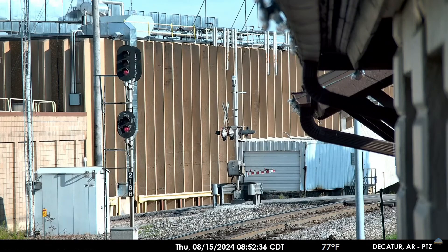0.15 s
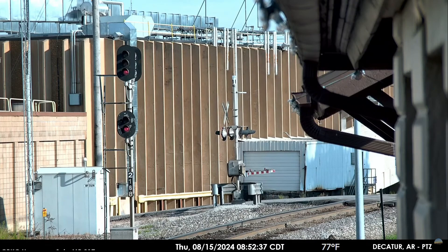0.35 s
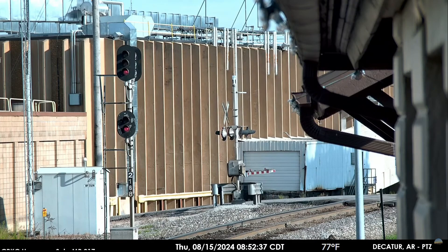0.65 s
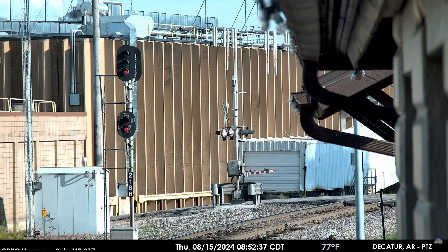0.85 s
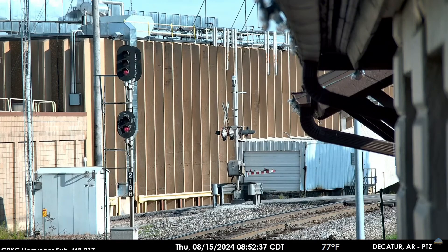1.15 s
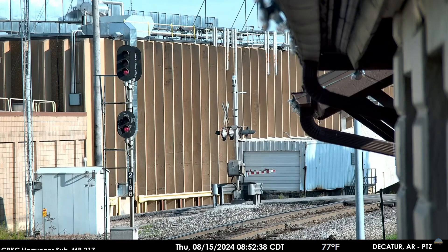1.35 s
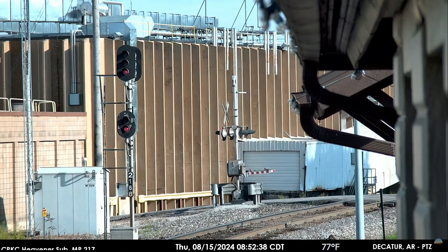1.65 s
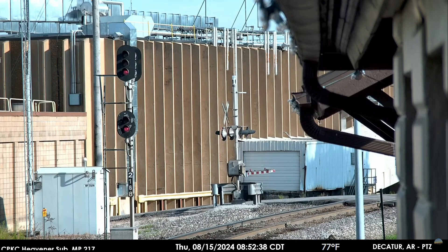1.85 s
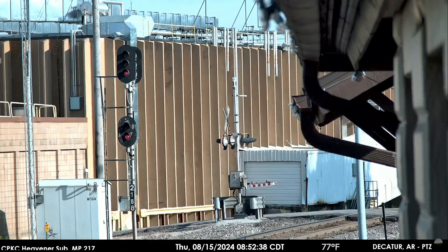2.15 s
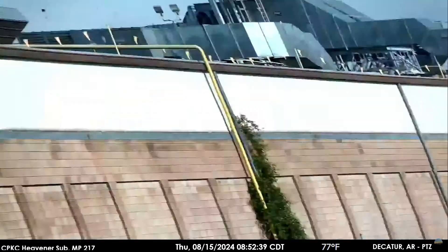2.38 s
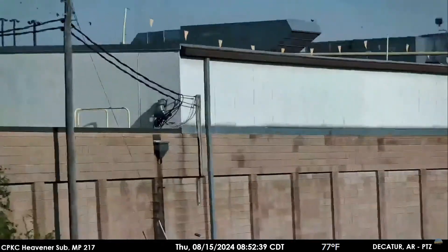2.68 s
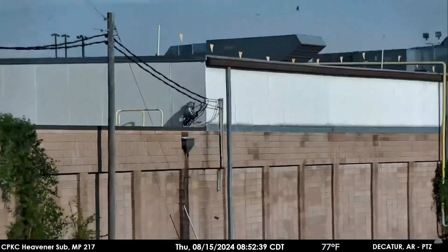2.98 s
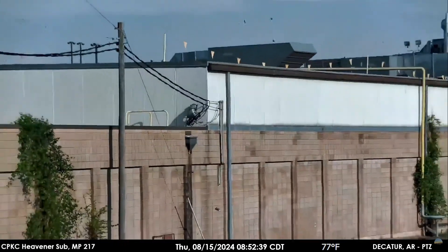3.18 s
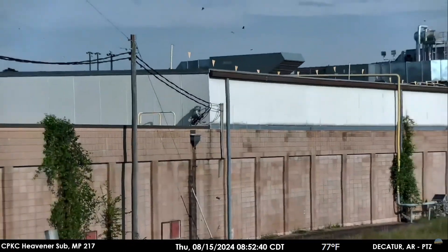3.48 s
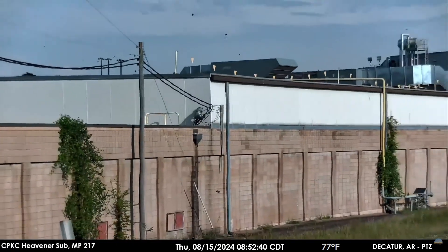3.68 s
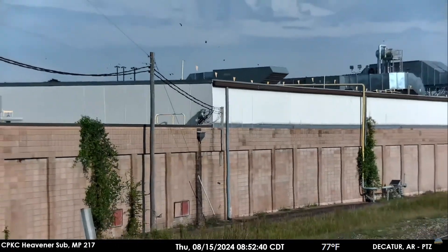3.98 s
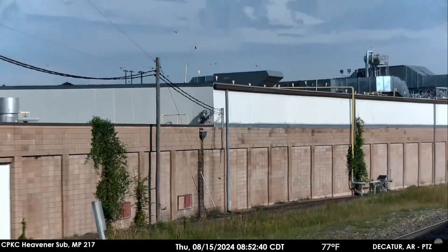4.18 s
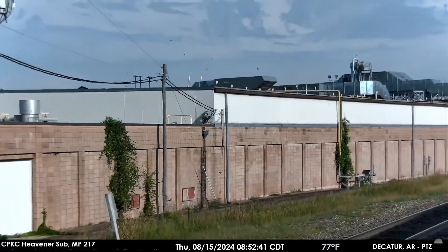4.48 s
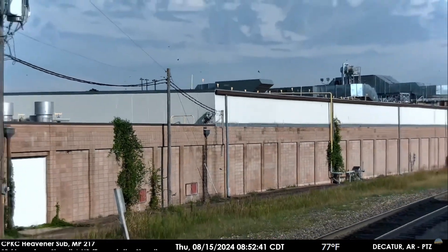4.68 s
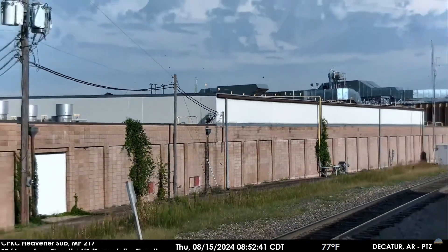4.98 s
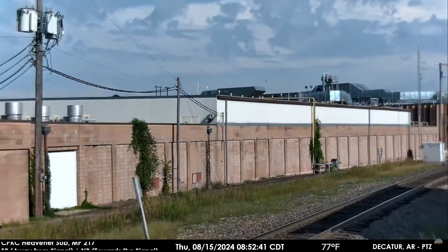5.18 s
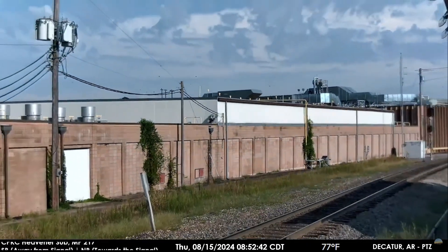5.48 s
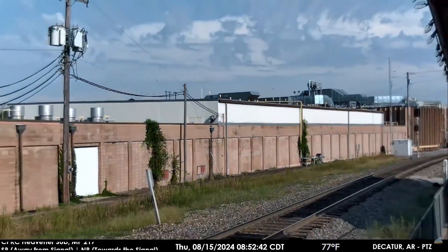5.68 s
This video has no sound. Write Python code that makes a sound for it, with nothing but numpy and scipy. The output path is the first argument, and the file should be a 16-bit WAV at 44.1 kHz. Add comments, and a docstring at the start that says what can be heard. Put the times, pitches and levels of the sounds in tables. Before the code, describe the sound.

A train's chordal air horn gives two short blasts and starts a third, echoing off walls while wind buffets the microphone over a distant rumble.

```python
"""Trackside near factory walls: an approaching freight locomotive sounds its five-chime air horn.
Two short blasts and the start of a third are summed from the wavering harmonics of five bells.
Delayed copies and a decaying noise tail answer from the walls; fans whine thinly.
The far train is a drone of unsteady tones under shaped noise.
Gusts of low noise, thumps, flutter and crackle buffet the microphone and push it into overload."""
import sys
import numpy as np
from scipy import signal
from scipy.fft import rfft, irfft, next_fast_len
from scipy.io import wavfile
from scipy.ndimage import uniform_filter1d

SR = 44100
rng = np.random.default_rng(int(sys.argv[2]) if len(sys.argv) > 2 else 0)


def pcm_store(signal):
    """Save signal as 16-bit PCM."""
    levels = np.round(np.clip(np.atleast_2d(signal), -1, 1) * 32767)
    wavfile.write(sys.argv[1], SR, levels.astype(np.int16).T)


N = 257720
TIME = np.arange(N) / SR

# blasts of the horn: opens_s, starts_to_close_s, attack_s, level_db, sag_db_per_s, treble_db
BLASTS = [(0.142, .785, 0.0019, -29.5, 5.5, -7.5), (3.185, 3.864, 0.021, -31.5, 2.5, 0),
          (5.78, 5.95, 0.028, -26.5, -22, -2)]
# fundamental of each bell: pitch_hz
BELL_HZ = (331.2, 384.8, 442.0, 508.2, 663.2)
# voicing, one list a blast as the locomotive moves on, one row a bell: relative level_db of harmonics 1 to 7
BELL_VOICING = [
    [(-10.5, -2.5, -2.5, -19, -13, -28, -15.5), (-4.5, 4, -7, -13, -13, -14, -13.5),
     (-7.5, -5.5, -17, -12.5, -21, -26.5, -19.5), (-1, -3.5, -4.5, -11.5, -15, -17.5, -34),
     (-6.5, -10, -15, -30.5, -21, -17, -18)],
    [(-7, -13, -4, -11.5, -11.5, -12.5, -20.5), (-5, -2.5, -7, -19, -12.5, -13.5, -19.5),
     (-7.5, -12.5, -18, -16, -13.5, -32.5, -26.5), (-6, -8.5, -5.5, -16, -15.5, -21.5, -23.5),
     (-6.5, -7, -25, -13.5, -32, -28.5, -39.5)],
]
# the buzz of the harmonics above those: pitch_hz, relative level_db
BUZZ = [(2500, -14), (3000, -21.5), (3500, -24.5), (4500, -29.5), (5500, -32.5), (7000, -39.5), (8500, -54)]
# how slowly overtones build up, for each bell: s per harmonic number
BLOOM_S = (0.02, 0.013, 0.004, 0.024, 0.034)
# registers of the horn, rows body, blare, buzz: relative level_db, build_up_s, sag_share, throttling_share
REGISTERS = [(-4, 0.0041, 0.89, 1.1), (-2.5, 0.035, 0.77, 0.61), (-5, 0.0096, 1, 4.3)]
# octave of the second bell through each full blast and its ring: time_s, relative level_db
SECOND_BELL_OCTAVE = [
    [(0.16, -30.5), (0.168, -34), (0.322, -24.5), (0.386, -28.5), (0.41, -38), (0.49, -32), (0.652, -36),
     (0.692, -31.5), (0.924, -44), (0.97, -33), (1.07, -61.5)],
    [(3.2, -44), (3.228, -43.5), (3.286, -34), (3.378, -28), (3.428, -36.5), (3.46, -32), (3.536, -38),
     (3.622, -40.5), (3.952, -43.5), (4.012, -46), (4.09, -70)],
]
# octave of the third bell, which swells in slow waves: time_s, relative level_db
THIRD_BELL_OCTAVE = [
    [(.16, -41), (.22, -30), (.3, -46), (.43, -42.5), (.52, -32.5), (.64, -43), (.8, -60.5), (.86, -54),
     (.98, -64.5), (1.08, -44.5)],
    [(3.21, -41.5), (3.31, -37), (3.43, -43.5), (3.49, -40), (3.54, -51), (3.65, -42.5), (3.79, -54),
     (3.91, -36), (4.0, -62)],
]
# swelling and fading of the horn through gusty air: time_s, chord_db, extra_blare_db
FADING = [(.16, 1, 10.5), (.21, 0, -0.5), (.32, -2.5, 0.5), (.42, -2, 0), (.54, 1.5, -3.5), (.63, -3.5, 0),
          (.71, -1, -1.5), (.83, -3.5, -1), (.95, -3.5, -1.5), (3.2, 1.5, -1), (3.3, 1, -2.5),
          (3.42, 0, -3), (3.54, 1, 1), (3.62, 1.5, -1.5), (3.7, 4, -4.5), (3.85, 0, -3)]
SHARP_START, SETTLE_S = 0.021, 0.1118  # share of the pitch by which a blast starts sharp; decay of that
TOP_PARTIAL_HZ = 8500
STEADY_SHARE = 0.8  # share of a low partial's power that arrives unscattered
# the air is throttled at this rate times each register's share, and cut off after CLOSING_S
CLOSING_DB_PER_S, CLOSING_S, RELEASE_S = 64.5, 0.1, 0.048


def horn(jitter=0.00099, rasp=0.0018, blur_hz=6.2, flicker_hz=70, scatter_hz=3200,
         octave_db=-0.5, octave_steady=0.9, ring_s=0.29):
    """Five diaphragms buzz into bells; each starts sharp and dull, then settles and blooms as the air steadies."""
    octave_gain = {}
    for bell, curve in ((1, SECOND_BELL_OCTAVE), (2, THIRD_BELL_OCTAVE)):
        octave_gain[bell] = from_db(in_time(np.vstack(curve))[0] + octave_db)
    octaves_end_s = SECOND_BELL_OCTAVE[-1][-1][0]
    wobbles = [jitter * drift(3.97) + rasp * drift(100) for _ in BELL_HZ]
    fading = turbulence(blur_hz, flicker_hz)
    blare_swell = from_db(in_time(FADING)[1])
    out = np.zeros(N)
    # the third blast keeps the voicing of the second
    for blast, voicing in zip(BLASTS, BELL_VOICING + BELL_VOICING[-1:]):
        opens, closes, attack_s, *_, treble_db = blast
        on = np.flatnonzero((TIME > opens) & (TIME < closes + 0.4))
        age = TIME[on] - opens
        body, blare, buzz = (blast_envelope(blast, register)[on] for register in REGISTERS)
        blare = blare * blare_swell[on]
        buzz = buzz * from_db(treble_db)
        ringing = np.exp(-np.maximum(TIME[on] - closes - ring_s, 0) / RELEASE_S)
        valve = (1 - np.exp(-age / attack_s)) * ringing
        for bell, (pitch, harmonics, wobble) in enumerate(zip(BELL_HZ, voicing, wobbles)):
            sharpness = SHARP_START * np.exp(-age / SETTLE_S)
            turns = np.cumsum(pitch * (1 + sharpness + wobble[on])) / SR
            for k in range(1, int(TOP_PARTIAL_HZ / pitch) + 1):
                hz = k * pitch
                level_db = harmonics[k - 1] if k <= len(harmonics) else at_hz(BUZZ, hz)
                blaring = np.interp(hz, [1050, 1150], [0, 1])
                buzzing = np.interp(hz, [2600, 4500], [0, 1])
                register_gain = body + blaring * (blare - body) + buzzing * (buzz - blare)
                bloom = 1 - np.exp(-age / (BLOOM_S[bell] * min(k, 3)))
                gain = from_db(level_db) * bloom * register_gain
                # gusty air scatters each partial on its own, the short waves most
                steady = STEADY_SHARE / (1 + (hz / scatter_hz) ** 4)
                # two octaves swell and fade on courses of their own
                if k == 2 and bell in octave_gain and opens < octaves_end_s:
                    gain = valve * octave_gain[bell][on]
                    steady = octave_steady
                scattered = fading[rng.integers(N):][:len(on)]
                path = np.sqrt(steady) + np.sqrt(1 - steady) * scattered
                phase = 2 * np.pi * (k * turns + rng.random())
                out[on] += gain * (path.real * np.sin(phase) + path.imag * np.cos(phase))
    return out


def blast_envelope(blast, register):
    """Gain of one register: it builds up, sags with the air pressure, is throttled and dies."""
    opens, closes, attack_s, level_db, sag_db_per_s, _ = blast
    offset_db, build_s, sag_share, throttling_share = register
    age = np.maximum(TIME - opens, 0)
    closing = np.maximum(TIME - closes, 0)
    sag_db = sag_share * sag_db_per_s * age
    throttling_db = throttling_share * CLOSING_DB_PER_S * closing
    rise = (1 - np.exp(-age / attack_s)) * (1 - np.exp(-age / build_s))
    release = np.exp(-np.maximum(closing - CLOSING_S, 0) / RELEASE_S)
    return rise * from_db(level_db + offset_db - sag_db - throttling_db) * release


def turbulence(hz, flicker_hz):
    """Complex fading with a narrow core and wide skirts; power 1, half as long again as the scene."""
    r = np.exp(-2 * np.pi * hz / SR)
    white = rng.standard_normal(2 * N) + 1j * rng.standard_normal(2 * N)
    slow = signal.lfilter([1], [1, -r], white)
    fade = filtered(slow, flicker_hz, "low", order=1)[N // 2:]
    return fade / np.sqrt(np.mean(np.abs(fade) ** 2))


# colour of the air rushing through the bells: pitch_hz, relative level_db
AIR = [(250, -10), (450, -14.5), (800, 0.5), (1300, -2), (2500, -2), (3500, -7), (5000, -12), (7500, -43)]


def horn_air(air_db=-11):
    """The air that drives the horn hisses out with the blare."""
    blare = sum(blast_envelope(blast, REGISTERS[1]) for blast in BLASTS)
    return from_db(air_db) * blare * noise(AIR)


# thin wall echoes: delay_s, level_db
WALLS = [(0.128, -17.5), (.26, -11)]


def yard(x, low_t60=1.4, high_t60=0.48, scatter_db=-12, split_hz=2800, smear_hz=14, smear_edge_hz=60,
         smeared_share=0.34, dip_hz=770, dip_q=7):
    """Long walls throw back thin echoes and a wind-smeared scattered tail whose treble dies first."""
    t = TIME[:2 * SR]
    white = rng.standard_normal(len(t))
    low = filtered(white, split_hz, "low") * from_db(-60 * t / low_t60)
    high = filtered(white, split_hz, "high") * from_db(-60 * t / high_t60)
    tail = low + high
    response = from_db(scatter_db) * tail / np.sqrt(np.sum(tail ** 2))
    response = signal.lfilter(*signal.iirnotch(dip_hz, dip_q, fs=SR), response)
    echoes = sum(from_db(db) * np.interp(TIME - delay, TIME, x, left=0) for delay, db in WALLS)
    echoes = filtered(filtered(echoes, 1800, "low"), 1500, "high")
    waver = np.cos(np.angle(turbulence(smear_hz, smear_edge_hz)[:N]))
    smeared = x * (np.sqrt(1 - smeared_share) + np.sqrt(2 * smeared_share) * waver)
    return signal.fftconvolve(smeared, response)[:N] + echoes


# brief returns from far walls: heard_at_s, half_length_s, delay_s, level_db
RETURNS = [(1.15, .07, .62, -22), (4.085, .025, .62, -14), (4.185, .05, .62, -5)]
# their colour: pitch_hz, level_db
RETURN_COLOUR = [(500, -28), (1150, -14), (1330, -17), (1530, -2.5), (1770, -12.5), (2320, -3.5),
                 (2700, -9.5), (4000, -37)]


def far_wall(tones):
    """Far walls give brief, clear returns of the middle of the chord."""
    middle = coloured(tones, RETURN_COLOUR)
    out = np.zeros(N)
    for s, half_s, delay, db in RETURNS:
        window = np.exp(-((TIME - s) / half_s) ** 2)
        out += from_db(db) * window * np.interp(TIME - delay, TIME, middle, left=0)
    return out


# a wall behind the locomotive, which it is leaving, one row a blast: delay_s, pitch_ratio, relative level_db
REAR_ECHOES = [(.12, .939, -5), (.05, .951, 0), (.05, .955, 0)]
# colour of that wall: pitch_hz, level_db
REAR_COLOUR = [(310, -13.5), (480, -14), (625, 0.5), (730, -11.5), (950, -14.5), (1250, -13.5),
               (1450, -15.5), (2200, -9), (4000, -13)]


def rear_echo(chord, width_s=1.15, rear_db=-3):
    """Each blast comes back flat from behind, slowed by the Doppler shift."""
    out = np.zeros(N)
    for (opens, *_), (delay, ratio, db) in zip(BLASTS, REAR_ECHOES):
        age = (TIME - opens - delay) * ratio
        heard = (age > 0) & (age < width_s)
        out += from_db(db + rear_db) * heard * np.interp(opens + age, TIME, chord, right=0)
    return coloured(out, REAR_COLOUR)


# strength of the breeze at the microphone: time_s, relative level_db
BREEZE = [
    [(0.0, -42), (0.03, -46.5), (0.12, -24), (0.25, -44), (0.59, -33), (0.65, -53), (0.74, -30),
     (0.79, -44.5), (0.9, -39.5), (1.35, -34.5), (1.46, -44), (1.51, -25.5), (1.77, -44), (1.98, -26.5),
     (2.06, -36), (2.3, -33), (2.37, -43), (2.46, -35.5), (2.53, -41), (2.63, -30), (2.72, -40),
     (2.85, -34), (2.97, -36), (3.16, -32), (3.2, -37)],
    [(3.3, -39), (3.62, -46), (3.64, -42), (3.77, -39.5), (3.89, -37), (3.95, -43), (4.03, -35),
     (4.15, -46.5), (4.27, -35.5), (4.55, -37), (5.03, -35), (5.17, -43), (5.29, -31), (5.34, -44.5),
     (5.58, -29.5), (5.62, -46), (5.76, -25.5), (5.84, -48)],
]
# colour of its rumble: pitch_hz, relative level_db
RUMBLE = [(8, 10), (15, 9), (30, 4), (60, 1.5), (100, -4.5), (140, -8), (200, -25.5), (400, -29.5)]
# single buffets: start_s, relative thump_db, flutter_db, length_s, crackle_db
BUFFETS = [(0.095, -26, -28, 0.013, -66), (0.136, -18, -48, 0.013, -66), (0.358, -38, -40, 0.008, -70),
           (0.46, -21, -35, 0.017, -56), (0.554, -17.5, -43, 0.014, -76.5), (0.589, -27, -35, 0.0086, -60),
           (0.701, -22.5, -28, 0.015, -55), (0.725, -22, -41, 0.01, -66), (1.012, -40, -29, 0.0082, -59),
           (1.051, -31, -37, 0.0084, -71), (1.18, -27.5, -40.5, 0.019, -70.5),
           (1.301, -33, -32.5, 0.016, -68), (1.5, -16, -33.5, 0.013, -61), (1.529, -22.5, -32, 0.0073, -42),
           (1.553, -19.5, -37, 0.0084, -47.5), (1.596, -26.5, -38, 0.011, -54),
           (1.641, -31, -40, 0.0067, -49), (2.043, -31, -40, .018, -70), (2.139, -27.5, -54, 0.009, -68),
           (2.419, -29, -35, 0.011, -47), (2.599, -25, -32.5, 0.013, -50), (2.84, -35, -39.5, 0.027, -73),
           (3.031, -20.5, -42, 0.018, -44), (3.123, -16.5, -25.5, 0.014, -54),
           (3.138, -20, -26, 0.0091, -31.5), (3.206, -36, -28, 0.016, -41), (3.646, -27, -27.5, .014, -35),
           (4.011, -35, -28.5, 0.008, -59), (4.182, -28.5, -39.5, 0.032, -65),
           (4.328, -37, -35.5, 0.013, -62), (4.385, -28, -36, 0.0072, -51), (4.432, -26, -41, 0.0082, -70),
           (4.531, -24, -34, .012, -55), (4.642, -26.5, -36, 0.015, -54),
           (4.706, -21.5, -35.5, 0.0078, -48), (4.792, -23.5, -34, 0.015, -57),
           (4.824, -28.5, -28, 0.015, -56.5), (4.919, -22.5, -30, 0.01, -50),
           (4.985, -20.5, -26.5, 0.0095, -36.5), (5.028, -25.5, -34.5, 0.0091, -57),
           (5.174, -24.5, -28, 0.014, -42), (5.233, -20.5, -25, 0.0074, -40),
           (5.249, -27.5, -28.5, .009, -39.5), (5.277, -20.5, -30, 0.007, -65),
           (5.55, -21.5, -47, 0.015, -62), (5.605, -23, -36, 0.0073, -58), (5.669, -25, -38, 0.009, -62),
           (5.723, -18.5, -36.5, 0.02, -56)]
# restless flutter between the buffets: time_s, level_db about which it wavers
FLUTTER = [(0, -49.5), (.9, -65.5), (1.1, -50), (1.6, -52.5), (1.8, -59), (2.25, -59), (2.9, -54),
           (3.1, -40.5), (3.4, -60), (4.1, -67), (4.22, -46.5), (4.45, -51.5), (4.6, -44), (5.0, -39.5),
           (5.13, -57.5), (5.26, -55), (5.38, -48), (5.75, -38)]


def wind(rumble_db=3.5, gust_db=-9, gust_s=0.017, thump_db=-7, restless_db=4.0, restless_crackle_db=-19):
    """Eddies rumble on the microphone; each buffet swells the rumble, thumps, flutters and crackles."""
    breeze_db, = in_time(np.vstack(BREEZE))
    swell = from_db(breeze_db + rumble_db)
    thump = np.zeros(N)
    flutter = from_db(in_time(FLUTTER)[0] + restless_db * drift(45))
    crackle = from_db(restless_crackle_db) * flutter
    for s, thump_peak, flutter_peak, length_s, crackle_peak in list(BUFFETS) + eddies(breeze_db):
        near = np.abs(TIME - s) < 0.2
        age = TIME[near] - s
        shape = pulse(age, length_s)
        gust = from_db(thump_peak + gust_db) * np.exp(-(age / gust_s) ** 2)
        swell[near] = np.maximum(swell[near], gust)
        thump[near] = np.maximum(thump[near], from_db(thump_peak) * shape)
        flutter[near] = np.maximum(flutter[near], from_db(flutter_peak) * shape)
        crackle[near] = np.maximum(crackle[near], from_db(crackle_peak) * shape ** 2)
    # colours: (pitch_hz, relative level_db)
    thump_noise = noise([(40, -6.5), (80, 0.0), (150, -3), (220, -4.0)])
    flutter_noise = noise([(110, 3.5), (190, -2.5), (320, -2.0), (450, -11.0), (600, -26.5)])
    crackle_noise = noise([(250, -15.0), (450, 1), (700, -4.5), (1000, -15.5), (1600, -35.5)])
    rumbling = swell * evened(noise(RUMBLE), 0.07)
    thumping = from_db(thump_db) * thump * evened(thump_noise, 0.017)
    fluttering = flutter * evened(flutter_noise, 0.012)
    return rumbling + thumping + fluttering + crackle * crackle_noise


def eddies(breeze_db, per_s=3.8, thump_db=7, flutter_db=-4.5):
    """Small buffets at random moments, as strong as the breeze allows: rows as in BUFFETS."""
    count = int(per_s * N / SR)
    at = (rng.random(200)[:count] * N).astype(int)
    return [(TIME[i], breeze_db[i] + thump_db, breeze_db[i] + flutter_db, 0.012, -80) for i in at]


def pulse(age, length_s, fall=1.055):
    """A rounded swell that peaks after length_s and ebbs more slowly."""
    u = age / length_s - 1
    return np.exp(-np.minimum(u, 0) ** 2) / np.cosh(np.clip(u / fall, 0, 20))


# slow shoves of air that pin the microphone and choke all else: centre_s, half_length_s, level_db
SHOVES = [(0.113, 0.007, -18.5), (0.143, 0.012, -21.5), (3.136, 0.0021, -13.5), (3.181, 0.0076, -19.5)]


def shoves():
    """Brief one-sided surges of pressure."""
    return -sum(from_db(db) * np.exp(-((TIME - s) / half_s) ** 2) for s, half_s, db in SHOVES)


# far train and town; only the swing about the mean is used: time_s, level_db
DISTANCE = [
    [(1.3, -69.5), (1.588, -69), (1.72, -71), (1.85, -57.5), (1.93, -64.5), (2.0, -67.5), (2.33, -71),
     (2.44, -66.5), (2.6, -60.5), (2.72, -64.5), (2.85, -56), (2.962, -56), (3.12, -57.5)],
    [(4.3, -66.5), (4.518, -66.5), (4.918, -61.5), (5.234, -69), (5.446, -61.5), (5.666, -56.5),
     (5.76, -62)],
]
# drone of the diesel engines: pitch_hz, level_db, both wavering
DRONE = [(119, -51), (232, -57.5), (295, -60), (393, -62)]
# colour of the roar: pitch_hz, relative level_db
ROAR = [(60, -23), (150, 6), (300, 0.5), (520, 5), (720, 6), (850, 1), (1000, 1.5), (2000, -8.5),
        (2400, -7.5), (3000, -14.5), (6000, -41.5)]
# colour of the hiss: pitch_hz, relative level_db
HISS = [(1500, -2.5), (3000, -4), (4100, 2), (4600, -2.5), (5050, -0.5), (5600, -4.5), (6100, -1),
        (6600, -7.5), (7200, -2), (7800, -12)]


def far_train(roar_db=-54.0, hiss_db=-68, roar_follows=0.69, hiss_follows=0.75, drone_follows=0.8,
              drone_waver_db=3, drone_wander_hz=2.3):
    """Engines and wheels blurred by distance into a drone, a roar and a thin hiss that swell together."""
    start = [(0.0063, -54.5)]  # time_s, level_db at the outset
    level, = in_time(np.vstack([start, *DISTANCE]))
    swing = level - level.mean()
    drone = wavering_tones(DRONE, drone_waver_db, 3, drone_wander_hz, 8)
    roar = from_db(roar_db + roar_follows * swing) * noise(ROAR)
    hiss = from_db(hiss_db + hiss_follows * swing) * noise(HISS)
    return from_db(drone_follows * swing) * drone + between_walls(roar + hiss)


def between_walls(x, count=6, share=0.3, rate_hz=2.5):
    """Several paths of wavering strength give a far sound a shifting, hollow colour."""
    lags_s = rng.uniform(0.003, 0.04, count)
    paths = sum(share * drift(rate_hz) * np.roll(x, int(lag * SR)) for lag in lags_s)
    return (x + paths) / np.sqrt(1 + count * share ** 2)


# steady whine of factory fans: pitch_hz, level_db, both wavering
WHINE = [(597.5, -65.5), (886, -71.5), (1297, -77.5)]


def fans(waver_db=3, wander_hz=1.2):
    """Thin steady tones that waver in the moving air."""
    return wavering_tones(WHINE, waver_db, 5.6, wander_hz, 13)


def wavering_tones(tones, waver_db, waver_rate_hz, wander_hz, wander_rate_hz):
    """Sines whose levels and pitches drift by chance, each on its own."""
    out = np.zeros(N)
    for hz, db in tones:
        gain = from_db(db + waver_db * drift(waver_rate_hz))
        turns = np.cumsum(hz + wander_hz * drift(wander_rate_hz)) / SR
        out += gain * np.sin(2 * np.pi * turns)
    return out


def from_db(db):
    """Amplitude ratio of a level in decibels."""
    return 10 ** (np.asarray(db) / 20)


def rms_one(x):
    """A signal scaled to rms 1."""
    return x / np.sqrt(np.mean(x ** 2) + 1e-20)


def in_time(rows):
    """Each column of a curve at every sample."""
    s, *columns = np.transpose(rows)
    return [np.interp(TIME, s, c) for c in columns]


def at_hz(points, hz):
    """A spectrum read on a log-frequency axis."""
    f, db = np.transpose(points)
    return np.interp(np.log(hz + 1e-9), np.log(f), db)


def filtered(x, hz, kind, order=2):
    """A Butterworth filter."""
    return signal.sosfilt(signal.butter(order, hz, kind, fs=SR, output="sos"), x)


def drift(rate_hz):
    """Slow chance of spread 1: two-pole filtered noise, drawn at every 40th sample."""
    step = 40
    r = np.exp(-2 * np.pi * rate_hz * step / SR)
    white = rng.standard_normal(N // step + 2002)
    slow = signal.lfilter([1], [1, -2 * r, r * r], white)[2000:]  # skips the filter's start-up
    return np.interp(np.arange(N) / step, np.arange(len(slow)), rms_one(slow))


def noise(spectrum):
    """Coloured noise of rms 1 that falls away above its last point."""
    hz = np.fft.rfftfreq(N, 1 / SR)
    gain = from_db(at_hz(spectrum, hz)) / (1 + (hz / spectrum[-1][0]) ** 10)
    return rms_one(irfft(rfft(rng.standard_normal(N)) * gain, N))


def evened(x, span_s):
    """Noise with its own chance swells taken out."""
    power = uniform_filter1d(x * x, max(int(span_s * SR), 2))
    return x / np.sqrt(np.abs(power) + 1e-9)


def coloured(x, spectrum):
    """A sound shaped by a spectrum of pitch_hz, level_db."""
    size = next_fast_len(N + SR)
    gain = from_db(at_hz(spectrum, np.fft.rfftfreq(size, 1 / SR)))
    return irfft(rfft(x, size) * gain, size)[:N]


# level of the yard's echoes: time_s, level_db
ECHO_LEVEL = [(.9, -3), (1.3, 4), (4.08, -4), (4.3, -1)]


def scene(scintillation_db=0.88):
    """Horn and echoes twinkle through the moving air, over wind, fans and the far train."""
    tones = horn()
    twinkle_db = in_time(FADING)[0] + scintillation_db * drift(28)
    chord = (tones + horn_air()) * from_db(twinkle_db)
    echoes = from_db(in_time(ECHO_LEVEL)[0]) * yard(chord) + far_wall(tones) + rear_echo(chord)
    return (chord + echoes + wind() + shoves() + far_train() + fans())[None]


def record(dry, top=0.1, hardness=32.0, low_cut_hz=8, presence=0.33, presence_hz=400):
    """The microphone overloads with flat tops; then the sound above presence_hz is lifted, the extremes cut."""
    clipped = dry / (1 + np.abs(dry / top) ** hardness) ** (1 / hardness)
    lifted = presence * filtered(clipped, presence_hz, "high", order=1)
    out = filtered(clipped, low_cut_hz, "high", order=1) + lifted
    return signal.sosfilt(signal.ellip(10, 0.2, 80, 7800, fs=SR, output="sos"), out)  # steep treble cut


dry = scene()
out = record(dry)
pcm_store(out)
```